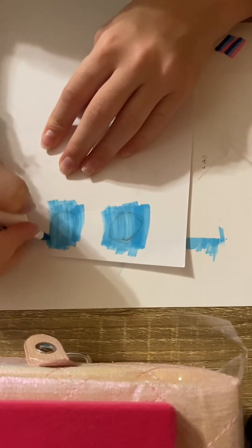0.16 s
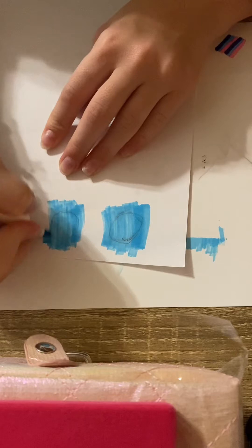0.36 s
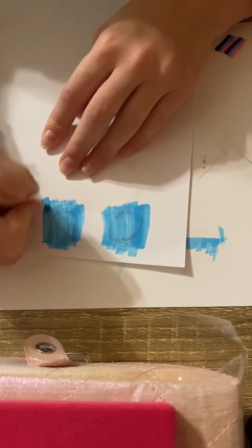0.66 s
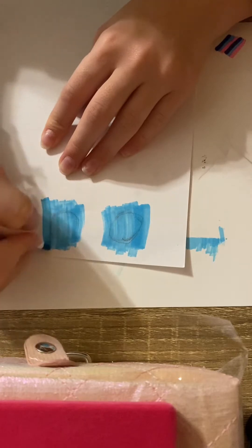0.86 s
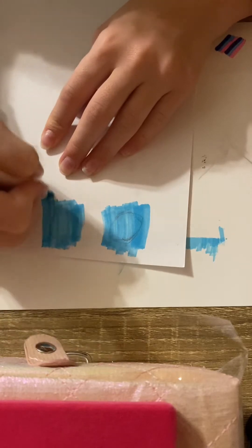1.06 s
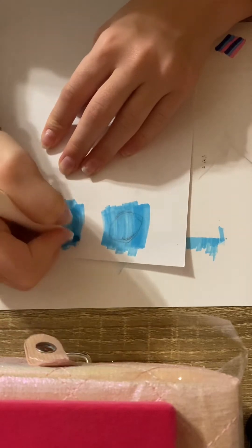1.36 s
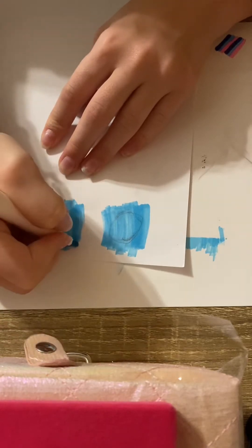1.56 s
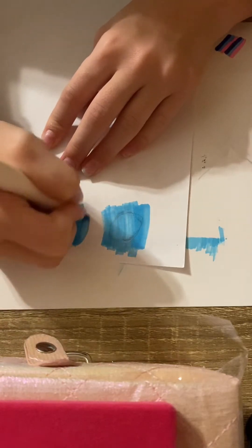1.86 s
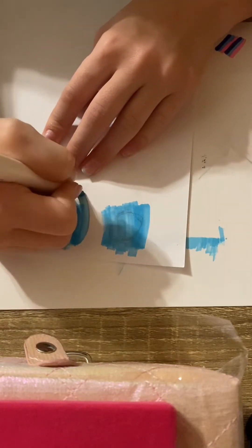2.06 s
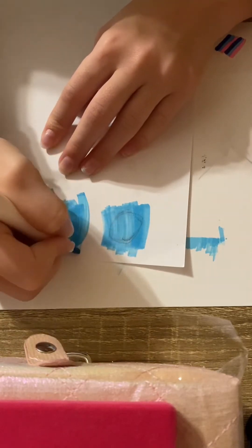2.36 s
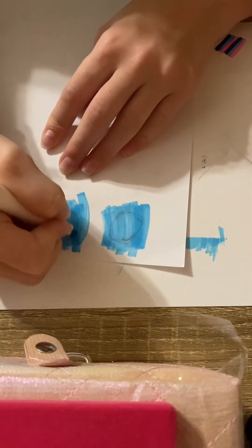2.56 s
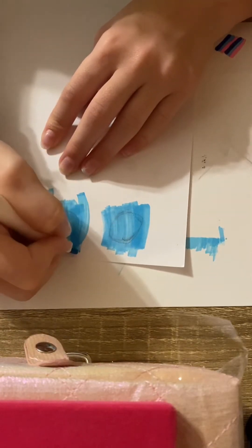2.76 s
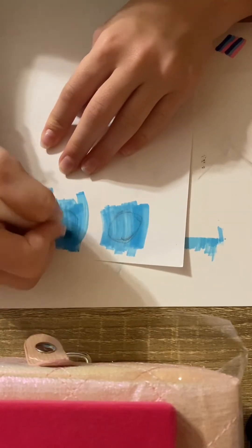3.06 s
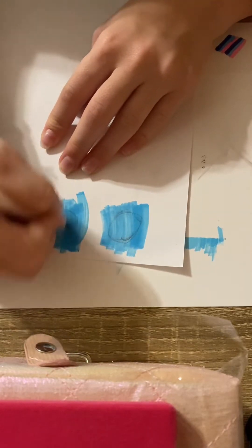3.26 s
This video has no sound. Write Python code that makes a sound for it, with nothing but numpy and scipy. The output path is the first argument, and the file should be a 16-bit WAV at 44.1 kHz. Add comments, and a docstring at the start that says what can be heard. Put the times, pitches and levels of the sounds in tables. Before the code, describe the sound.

After a light table knock, a felt-tip pen scratches dryly over paper with small squeaks and pauses, quickening near the end before a soft hand brush; quiet indoor room, close phone microphone in stereo.

```python
"""A low sway wavers in a quiet room, a hand knocks on the table, then a felt marker scribbles on paper.
The scrape is noise for dense tiny slips over the fibres, coloured by resonances of pen and sheet.
Short gliding sine tones squeak where the tip sticks; the sliding hand is a band of restless noise.
Knocks are falling thuds with ringing table modes; the room and the sway are coloured noise.
A nearby phone with two microphone ports hears pen and hand with differing phase and short tails."""
import sys
import numpy as np
from scipy import signal
from scipy.fft import rfft, irfft
from scipy.io import wavfile
from scipy.ndimage import uniform_filter1d

SR = 44100
rng = np.random.default_rng(int(sys.argv[2]) if len(sys.argv) > 2 else 0)


def transcribe(u):
    """Save the signal u as a 16-bit wav file named by the first command-line argument.

    u: samples, shape (n,) or (channels, n), limited to [-1, 1]; the rate is SR.
    q: integer samples, one column per channel.
    """
    v = np.clip(np.atleast_2d(u).T, -1, 1)
    q = np.round(v * 32767).astype(np.int16)
    wavfile.write(sys.argv[1], SR, q)


N = 149940  # samples, 3.4 s
TIME_S = np.arange(N) / SR
BIN_HZ = np.arange(N // 2 + 1) * SR / N


def undb(db):
    """Turn decibels into an amplitude factor."""
    return 10 ** (np.asarray(db) / 20)


def noise():
    """White noise over the whole scene, spread 1."""
    return rng.standard_normal(N)


def colour(x, table, rings=()):
    """Shape a spectrum by (hz, db) points and (hz, width_hz, gain_db) resonances; the result has rms 1."""
    points = np.array(table, float)
    hz = BIN_HZ + 0.00076  # keeps the logarithm finite at zero
    gain = undb(np.interp(np.log(hz), np.log(points[:, 0]), points[:, 1], left=-90, right=-90))
    for ring_hz, width_hz, gain_db in rings:
        gain = gain * (1 + (undb(gain_db) - 1) / (1 + 2j * (hz - ring_hz) / width_hz))
    y = irfft(rfft(x) * gain, N)
    return y / np.sqrt(np.mean(y ** 2))


def curve(rows):
    """Gain over time through (time_s, level_db) rows, smoothed over 2 ms and silent outside them."""
    rows = np.array(rows, float)
    level_db = np.interp(TIME_S, rows[:, 0], rows[:, 1], left=-150, right=-150)
    return uniform_filter1d(undb(level_db), size=88)


def walk(hz):
    """Smooth chance movement that takes a new target hz times a second; spread 1."""
    hold = int(SR / hz)
    steps = np.repeat(rng.standard_normal(N // hold + 1), hold)[:N]
    y = uniform_filter1d(steps, hold)
    return y / y.std()


def room():
    """Room air is wide coloured noise with faint hums; a brief mid rustle and the low sway sit in the centre."""
    # spectrum of the room air: pitch_hz, level_db
    air_colour = [(90, -4.5), (250, -14.5), (850, -21.5), (2140, -29.5), (2800, -34.5), (10500, -48.5),
                  (15900, -54)]
    # narrow hums in the air: pitch_hz, width_hz, gain_db
    hums = [(619.5, 17, 12), (1370, 28, 16.5), (2140, 200, 7.5)]
    # faint rustle over time: time_s, level_db
    rustle_levels = [(0, -76.5), (.2, -77.5), (.3, -101)]
    # low sway of the table over time: time_s, level_db
    sway_levels = [(0, -64.5), (.2, -56), (.85, -65), (1, -60.5), (1.3, -61.5), (1.45, -57.5), (1.7, -63),
                   (1.9, -55.5), (2, -63.5), (2.58, -64), (2.62, -50), (2.75, -56), (2.95, -60),
                   (3.25, -60), (3.4, -70)]
    # spectrum of the sway: pitch_hz, level_db
    sway_colour = [(20, -31), (37, -7.5), (52, 4), (66, -2), (97, -10), (140, -27.5)]
    room_db, side_db = -70, 3

    mid = colour(noise(), air_colour, hums)
    side = colour(noise(), air_colour, hums)
    highpass = signal.butter(1, 600, "high", fs=SR, output="sos")  # the lows stay central
    side = signal.sosfilt(highpass, side) * undb(side_db)
    air = mid + side * np.array([[1], [-1]])
    air_gain = undb(room_db + 1.87 * walk(11) + 1.66 * walk(3.2))

    rustle_colour = [(900, -36), (1800, 13.0), (2400, 5.0), (3000, -41.0)]
    rustle = curve(rustle_levels) * colour(noise(), rustle_colour)
    sway = curve(sway_levels) * colour(noise(), sway_colour)
    return air_gain * air + rustle + sway


def knocks():
    """A blow is a falling thud; table modes and a diffuse tail build up behind it, and soft blows are dull."""
    # hand on table: start_s, peak_db, hardness_hz (low-pass corner)
    blows = [(0.1957, -34, 1300), (1.11, -49.5, 376), (1.4248, -38, 1110), (3.192, -54.5, 330),
             (3.211, -51, 328)]
    # ringing table modes: pitch_hz, level_db re thud, t60_s
    modes = [(117.4, -9, 0.11), (239, -15, 0.11), (320, -13.5, .1)]
    thud_from_hz, thud_to_hz, pitch_fall_s, thud_s = 930, 260, .0012, .008
    push_s, build_cycles = .0014, 1.5  # build-up of thud and tail; build-up of each mode
    rattle_db, rattle_t60_s = -22.5, 0.11  # diffuse tail of the board

    t = np.arange(SR // 2) / SR
    push = (1 - np.exp(-t / push_s)) ** 2
    ring = np.zeros(len(t))
    for hz, db, t60 in modes:
        build = (1 - np.exp(-t * hz / build_cycles)) ** 2
        ring += undb(db - 60 * t / t60) * build * np.sin(2 * np.pi * hz * t)

    thud_hz = thud_to_hz + (thud_from_hz - thud_to_hz) * np.exp(-t / pitch_fall_s)
    ring += np.exp(-(t / thud_s) ** 2) * push * np.sin(2 * np.pi * np.cumsum(thud_hz) / SR)

    rattle = colour(noise(), [(150, -9), (450, -5), (900, -28)])
    rattle_gain = undb(rattle_db - 60 * t / rattle_t60_s) * push
    out = np.zeros(N)
    for start_s, peak_db, hardness_hz in blows:
        i = int(start_s * SR)
        tail = rattle[i:i + len(t)] * rattle_gain[:N - i]
        lowpass = signal.butter(2, hardness_hz, fs=SR, output="sos")
        blow = signal.sosfilt(lowpass, ring[:N - i] + tail)
        out[i:i + len(t)] += undb(peak_db) * blow / abs(blow).max()
    return out


def slides():
    """The hand brushes over the sheet: broad, bright friction noise with a restless level."""
    # one list for each brush: time_s, level_db
    brushes = [
        [(1.13, -85), (1.15, -66), (1.3, -64), (1.43, -74.5), (1.47, -117)],
        [(3.24, -55), (3.3, -60.5), (3.36, -72.5), (3.39, -107.5)],
    ]
    # spectrum of the brushing: pitch_hz, level_db
    brush_colour = [(1500, -7), (3000, -7), (5500, -2.5), (8000, -5), (11000, -2.5), (16000, -7.5)]
    gain = sum(curve(brush) for brush in brushes)
    return gain * undb(1.4 * walk(29.24)) * colour(noise(), brush_colour)


def squeaks():
    """Stick-slip of the tip sings gliding tones with an octave overtone; rough ones wobble in pitch and size."""
    # squeaks of the tip: start_s, length_s, start_hz, end_hz, level_db, roughness (0-1)
    tones = [(0.413, 0.041, 2233, 2166, -34, 0.31), (0.502, .009, 2190, 1650, -36.5, 0.32),
             (0.783, 0.016, 846, 730, -34.5, 0.28), (1.59, 0.0913, 640.4, 681, -42.5, 0.51),
             (1.655, .045, 688, 821, -40.5, 0.5), (1.648, 0.039, 2010, 2044, -45.5, 0.34),
             (1.696, 0.06, 2035, 2060, -39.5, 0.15), (1.7, 0.039, 1407, 1400, -45.5, 0),
             (2.228, 0.05, 2210, 2172, -47.5, 0.3), (2.688, .007, 1045, 614, -39.5, 0.23)]
    overtone_db, throb_db = -14, 6
    rise_share = 0.098  # share of the length

    out, wobble, throb = np.zeros(N), walk(900), walk(220)
    for start_s, length_s, start_hz, end_hz, level_db, rough in tones:
        i = int(start_s * SR)
        progress = np.linspace(0, 1, int(length_s * SR))
        span = slice(i, i + len(progress))
        glide_hz = start_hz + (end_hz - start_hz) * progress
        pitch_hz = glide_hz * (1 + 0.19 * rough * wobble[span])
        phase = 2 * np.pi * np.cumsum(pitch_hz) / SR
        tone = np.sin(phase) + undb(overtone_db) * np.sin(2 * phase)
        swell = np.minimum(progress / rise_share, 1) * np.sqrt(1 - progress ** 2)
        out[span] += undb(level_db + throb_db * rough * throb[span]) * swell * tone
    return out


def patchy(x, rasp_hz, count):
    """Narrow bands swell and fade apart as grip and angle shift; those near the moving rasp stand out."""
    patch_db, patch_hz = 2.02, 25.25
    rasp_db, rasp_octaves = 5, 0.16  # gain and width of the rasp resonance
    edges = np.log([300, 11000])  # centres of the outer bands, log Hz
    spectrum = rfft(x)
    place = np.interp(np.log(BIN_HZ + 1), edges, [0, count - 1])
    out = np.zeros(N)
    for k in range(count):
        centre_hz = np.exp(np.interp(k, [0, count - 1], edges))
        near_rasp = np.exp(-(np.log2(centre_hz / rasp_hz) / rasp_octaves) ** 2)
        band = irfft(spectrum * np.clip(1 - abs(place - k), 0, 1), N)
        out += undb(patch_db * walk(patch_hz) + rasp_db * near_rasp) * band
    return out


def scrape():
    """Fibres catch and slip under the tip: uneven grains in four parts, each fluttering on its own."""
    # pen strokes: start_s, end_s, scrape level on landing_db, at one third_db, at two thirds_db, on lifting_db,
    # body at start_db and at end_db (re scrape), low drag_db (re scrape), rasp centre_hz before drift
    strokes = [(0.294, 0.509, -47, -39, -36, -42, -5, -4, -14.5, 3470),
               (0.604, 0.768, -37.5, -45.5, -40, -46.5, -12.5, 0.5, -21, 3600),
               (0.769, 0.792, -51.5, -60.5, -54, -55, 7, 10, 8, 3630),
               (0.868, 1.057, -49.5, -40, -39.5, -39.5, -4.5, -6, -18.5, 3860),
               (1.111, 1.12, -47, -49.5, -57, -57.5, -13.5, -7, -13.5, 3400),
               (1.578, 1.706, -60.5, -59.5, -54, -50.5, -7, -5, 4, 3130),
               (1.705, 1.958, -42.5, -42, -38.5, -45, -3, -5, -14.5, 3100),
               (2.071, 2.265, -38.5, -40.5, -39.5, -46, -12, 0, -19, 3150),
               (2.414, 2.544, -53.5, -46, -49.5, -58, -6.5, -4, -12, 3120),
               (2.6, 2.68, -40.5, -44, -47, -48, -8, 0, -11.5, 2830),
               (2.688, 2.689, -44.5, -51.5, -52.5, -54.5, 2, 8, 7, 2870),
               (2.742, 2.824, -49, -47.5, -44.5, -54.5, -8, -4.5, -12.5, 3260),
               (2.844, 2.922, -50.5, -45.5, -46, -54.5, -12, -2, -15.5, 3280),
               (2.974, 3.053, -56.5, -49, -46.5, -51.5, -4.5, -9.5, -12.5, 3340),
               (3.068, 3.147, -50.5, -45, -46.5, -50, -8, -4, -16, 3350),
               (3.17, 3.25, -51.5, -53.5, -51.5, -61.5, -5, -10, -16, 3400)]
    # bright scrape: pitch_hz, level_db
    scrape_colour = [(4000, -17), (4700, -18.5), (5100, 1.5), (6000, -4.5), (8000, -10), (10000, -14),
                     (11500, -14.5), (16000, -29.5)]
    # mid body: pitch_hz, level_db
    body_colour = [(1500, -16.5), (2000, -9.5), (2600, -1.5), (3500, -0.5), (4200, -1), (4700, 5.5),
                   (5300, -39.5)]
    # low drag: pitch_hz, level_db
    drag_colour = [(300, -13.5), (450, -5.5), (650, 2.5), (1100, -0.5), (1600, 1.5), (2000, -9.5),
                   (2500, -11.5)]
    # table humming under the tip: pitch_hz, level_db
    board_colour = [(100, -13.5), (170, -12.5), (250, 3.5), (340, -5), (450, -21.5)]
    # resonances of pen and sheet: pitch_hz, width_hz, gain_db
    rings = [(610, 87, 1.5), (2022, 47, 6.5), (2672, 47, 8), (3832, 81, 9), (5770, 78, 3.5), (9530, 600, 5)]
    board_db = -23  # re scrape
    attack_s, release_s, edge_db = .007, .012, 28  # each stroke fades in and out from edge_db lower
    grain_db, flutter_db, flutter_hz = 1.5, 1, 87.2
    rasp_drift = .05  # spread of the drift as a share of the pitch

    slips = noise() * undb(grain_db * rng.exponential(size=N))
    gains = np.zeros((4, N))
    for start, end, land_db, third_db, late_db, lift_db, body_start_db, body_end_db, drag_db, _ in strokes:
        third = (end - start) / 3
        times = [start - attack_s / 2, start + min(attack_s, third) / 2,
                 start + third, end - third, end, end + release_s]
        levels = [land_db - edge_db, land_db, third_db, late_db, lift_db, lift_db - edge_db]
        gain = curve(np.c_[times, levels])
        body_db = np.interp(TIME_S, [start, end], [body_start_db, body_end_db])
        gains += [gain, gain * undb(body_db), gain * undb(drag_db), gain * undb(board_db)]

    rows = np.array(strokes)
    middle_s = (rows[:, 0] + rows[:, 1]) / 2
    rasp_hz = np.interp(TIME_S, middle_s, rows[:, -1]) * (1 + rasp_drift * walk(12))

    friction = np.zeros(N)
    for gain, part in zip(gains, (scrape_colour, body_colour, drag_colour, board_colour)):
        friction += gain * undb(flutter_db * walk(flutter_hz)) * colour(slips, part, rings)
    return patchy(friction, rasp_hz, count=36)


WIDE_TOP_HZ = 10800  # from here up left and right are set about half a cycle apart, so the sound is wide


def ports(x):
    """Two ports hear pen and hand with a wavering phase lag, a restless stray share and separate short tails."""
    # phase between the ports: pitch_hz, left_lead_rad
    port_phase = [(0, -2), (780, 1.62), (1900, 0.47), (2240, 1.46), (2950, 1.32), (3360, -1.4), (4250, -2),
                  (4600, -3), (5150, -1.48), (6050, 0.9), (7150, 1.16), (10300, 2)]
    stray_db, tail_t60_s, tail_db = -16, .15, -16
    waver_rad, right_db = 0.38, 2  # phase waver as the pen moves; lean to the right around 3 kHz

    points = np.array(port_phase + [(WIDE_TOP_HZ, np.pi)])
    lead = np.interp(BIN_HZ, points[:, 0], points[:, 1]) / 2
    lean_db = right_db / 2 * np.exp(-np.log2((BIN_HZ + 1) / 3000) ** 2 * 2)
    waver = waver_rad / 2 * walk(7.84)
    stray = undb(stray_db) * walk(600) * x

    t, out = np.arange(SR // 4) / SR, []
    for sign in (1, -1):  # left, right
        tail = rng.standard_normal(len(t)) * undb(-60 * t / tail_t60_s)
        tail *= undb(tail_db) / np.sqrt(np.sum(tail ** 2))
        shifted = irfft(rfft(x) * np.exp(1j * sign * lead) * undb(-sign * lean_db), N)
        direct = (signal.hilbert(shifted) * np.exp(1j * sign * waver)).real
        out.append(direct + sign * stray + signal.fftconvolve(x, tail)[:N])
    return np.array(out)


def scene():
    """Pen and hand pass through the ports' stereo picture; knocks and room are added to it."""
    return room() + knocks() + ports(slides() + squeaks() + scrape())


def record(dry):
    """Above about 10.8 kHz the middle thins out by up to 22 dB and the sides remain; the phone cuts the top."""
    top_hz = 15750
    mid, side = (dry[0] + dry[1]) / 2, (dry[0] - dry[1]) / 2
    mid_db = np.clip((WIDE_TOP_HZ - BIN_HZ) / 25, -22, 0)  # 1 dB for each 25 Hz
    mid = irfft(rfft(mid) * undb(mid_db), N)
    lowpass = signal.ellip(12, .2, 80, top_hz, fs=SR, output="sos")
    return signal.sosfilt(lowpass, np.array([mid + side, mid - side]))


dry = scene()
out = record(dry)
transcribe(out)
```